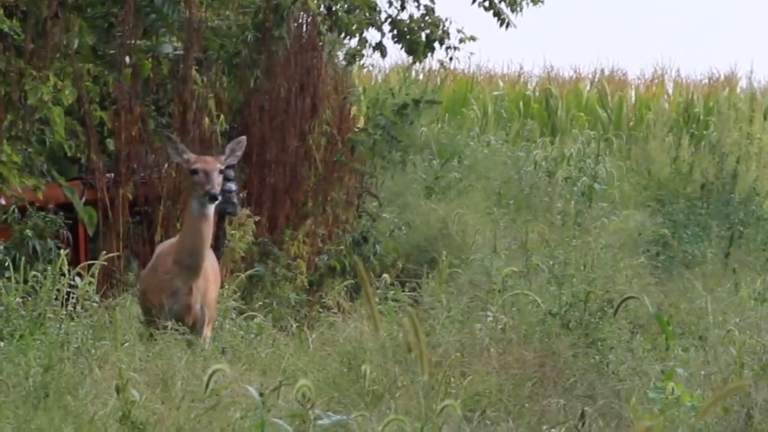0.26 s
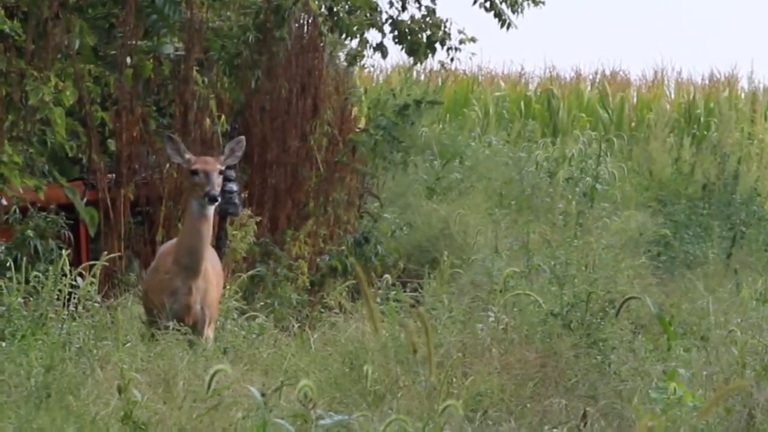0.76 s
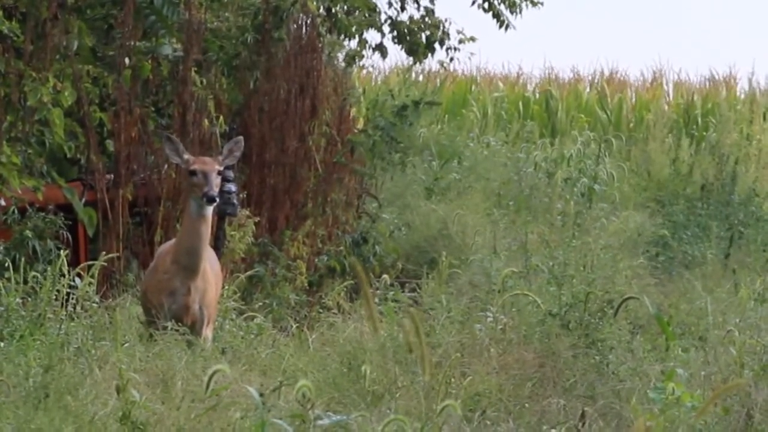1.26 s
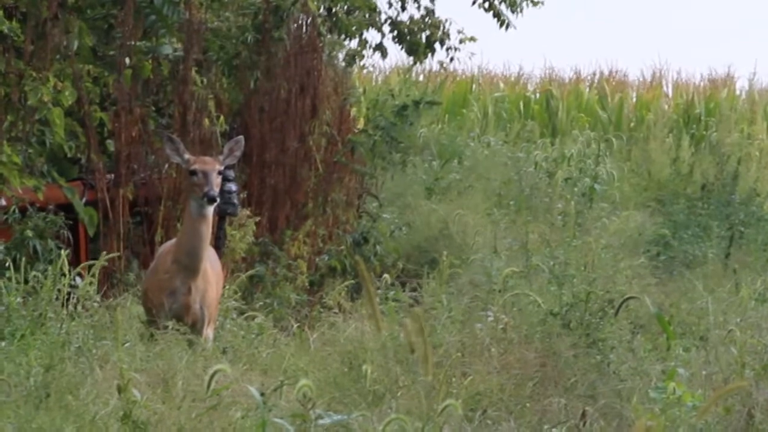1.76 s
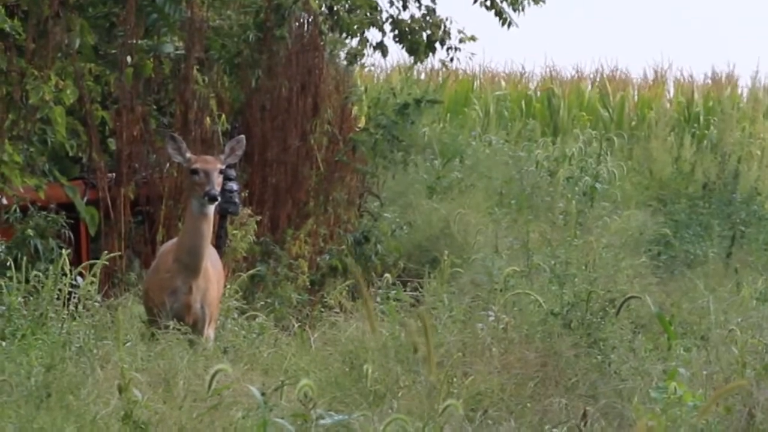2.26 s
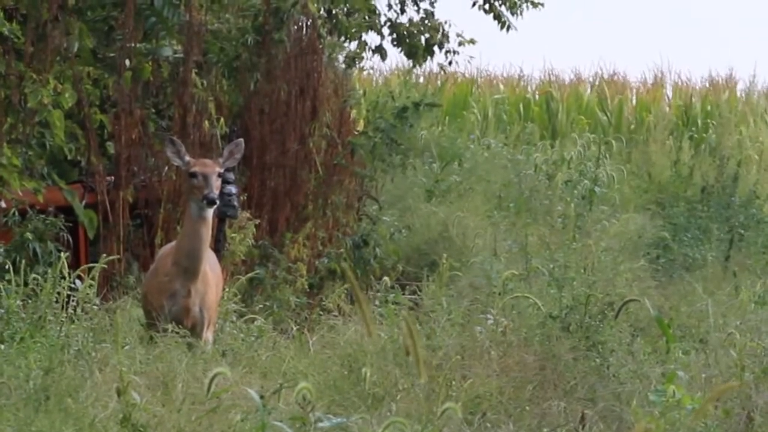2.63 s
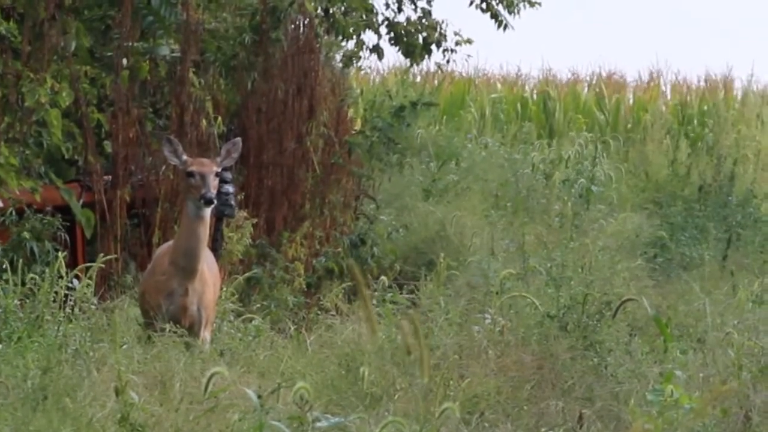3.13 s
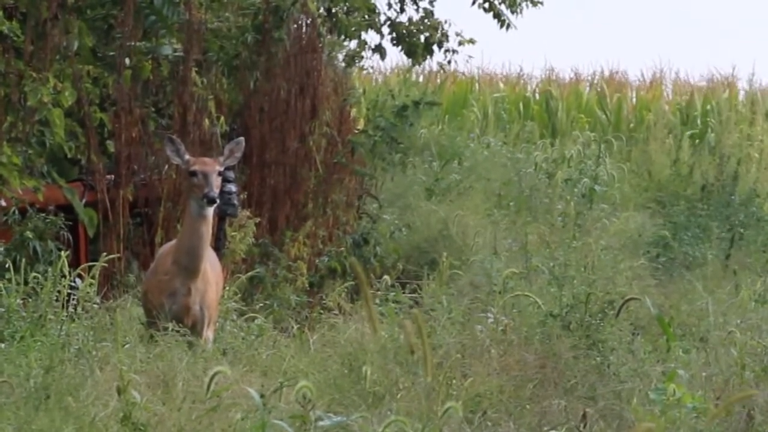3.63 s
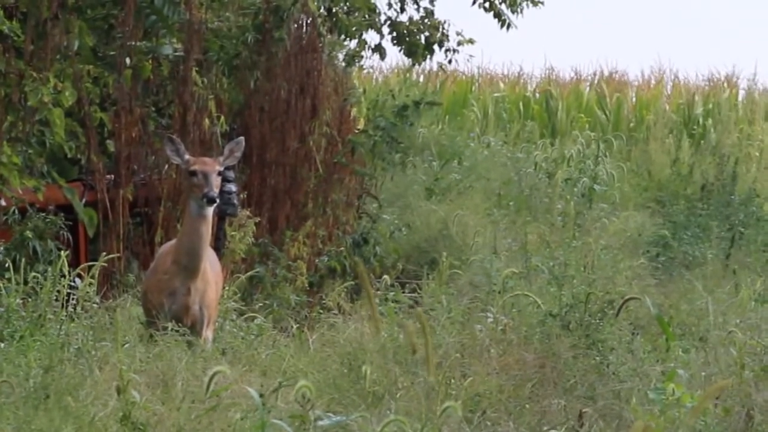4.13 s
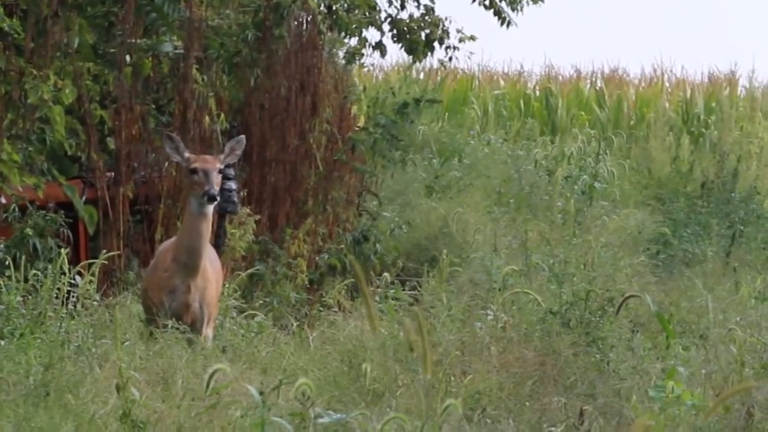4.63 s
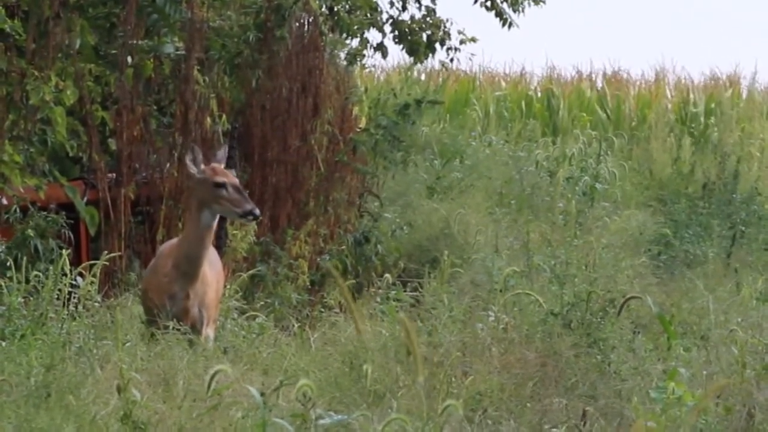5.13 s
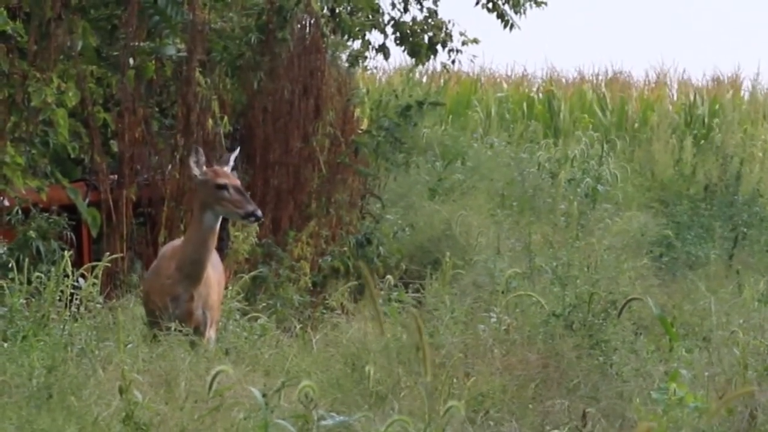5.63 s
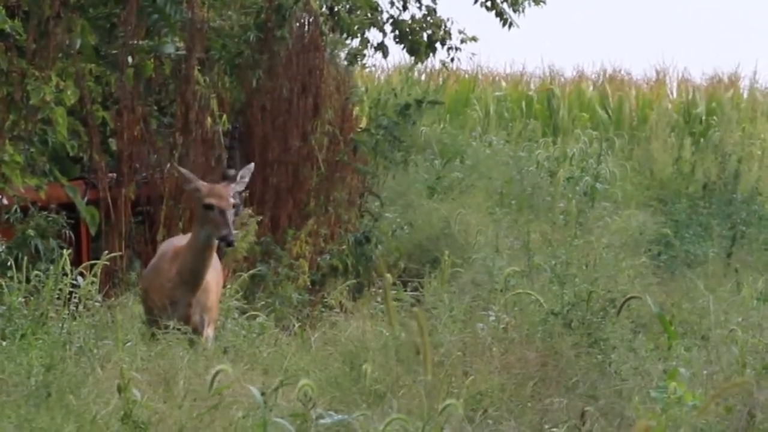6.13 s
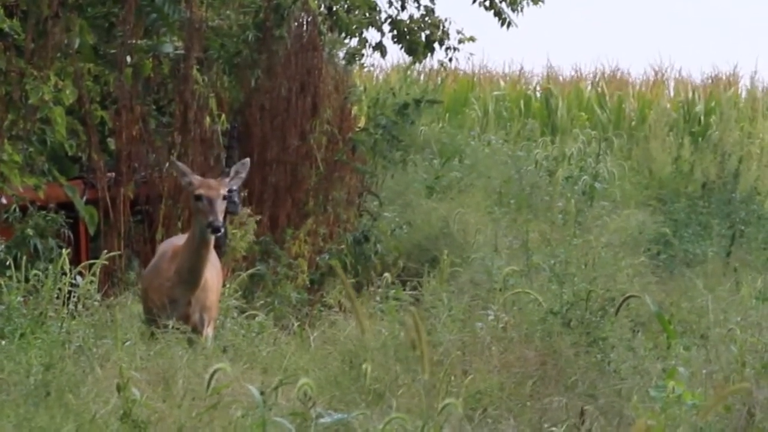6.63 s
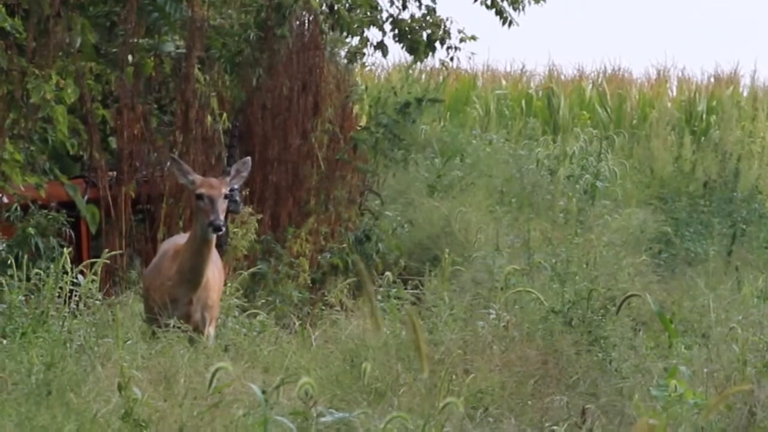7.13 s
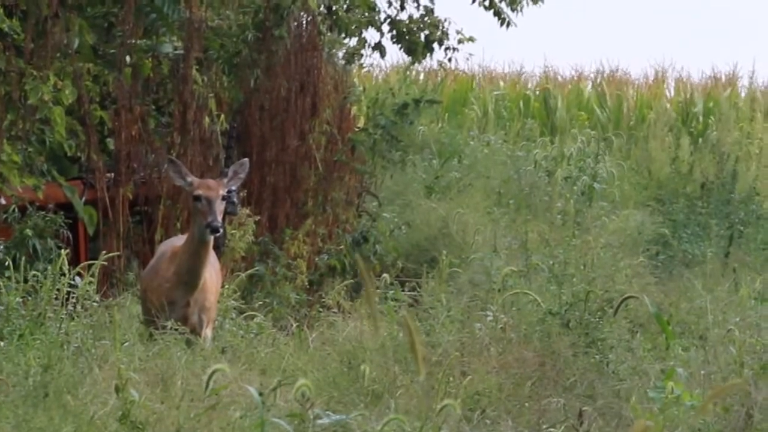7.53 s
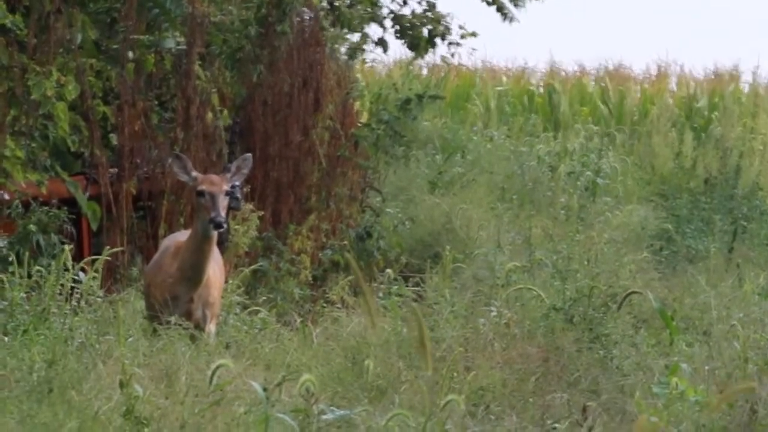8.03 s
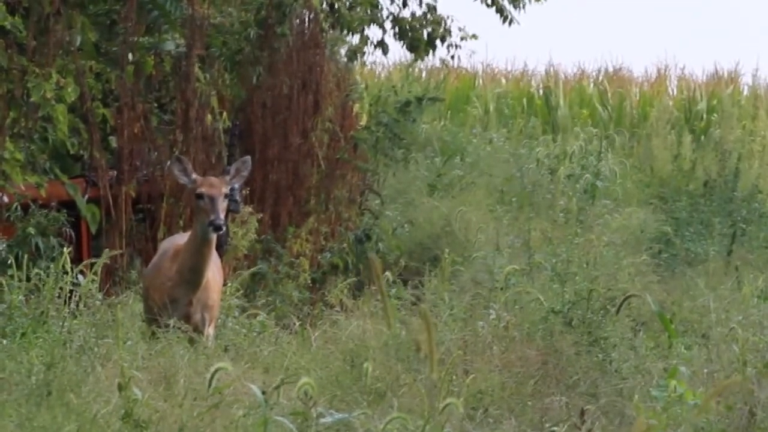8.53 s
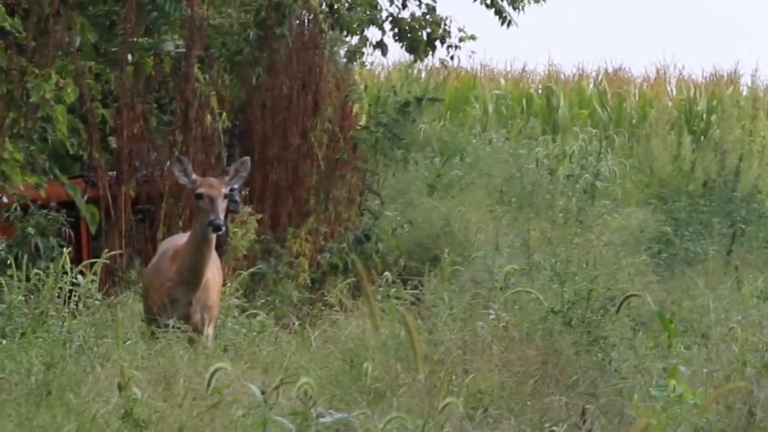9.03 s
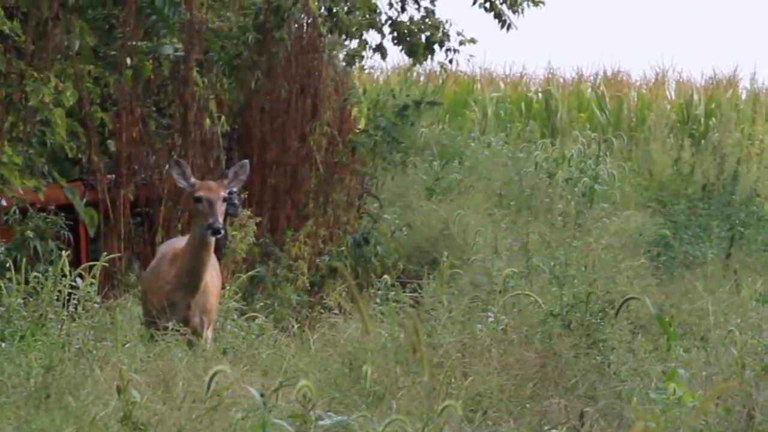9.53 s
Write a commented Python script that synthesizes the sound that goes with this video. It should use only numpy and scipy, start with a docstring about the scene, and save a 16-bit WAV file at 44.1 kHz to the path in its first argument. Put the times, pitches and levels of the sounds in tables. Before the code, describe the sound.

Outdoors beside tall grass and corn, insects sing without pause, slightly blurred by plants and trees. One rapid high triller stays steady, triple chirps grow stronger from midway, and a slower trill fades in for the last two seconds. Quiet airy hiss and distant road rumble sit below. Small dry ticks crackle close to the microphone early, a barely audible grass brush follows, and a single hard clack interrupts near the end. Same sound in both ears.

```python
"""Crickets sing in tall grass at the edge of a field: a fast and a slow triller, two that chirp in threes,
and a chorus of far ones, with more chirpers deep in the field. Each wing stroke is a short arched whistle,
scattered by plants and trees. Filtered noise makes the open air and the rumble of distant traffic; wavering
sines make two engine drones. Dry clicks and one clack, ringing small dead bodies, sound close by,
and one soft brush of noise passes in the grass."""
import sys
import numpy as np
from scipy import signal
from scipy.fft import rfft, irfft
from scipy.io import wavfile
from scipy.ndimage import uniform_filter1d

SR = 44100
rng = np.random.default_rng(int(sys.argv[2]) if len(sys.argv) > 2 else 0)


def wav_record(signal):
    """Record a signal, one row per channel, as 16-bit PCM in the file named by sys.argv[1]."""
    frames = np.transpose(np.atleast_2d(signal))
    bounded = np.clip(frames, -1, 1)
    # unit amplitude maps onto the largest positive 16-bit level
    quanta = np.round(bounded * 32767).astype(np.int16)
    wavfile.write(sys.argv[1], SR, quanta)


N = 431298  # length [samples]


def undb(db):
    """Decibels to amplitude gain."""
    return 10 ** (np.asarray(db) / 20)


def rms(x):
    """Root mean square."""
    return np.sqrt(np.mean(x ** 2))


def fade(t, t60):
    """Exponential decay that falls 60 dB in t60 seconds."""
    return np.exp(-np.log(1000) * t / t60)


def swell_of(rows):
    """A (time [s], level [dB]) table joined by straight lines, in dB about its own mean."""
    times, levels = np.transpose(rows)
    db = np.interp(np.arange(N) / SR, times, levels)
    return db - db.mean()


def add(out, s, sound):
    """Mix a sound in at time s, dropping whatever lies outside the scene."""
    i = int(s * SR)
    lo, hi = max(i, 0), min(i + len(sound), N)
    if hi > lo:
        out[lo:hi] += sound[lo - i:hi - i]


def walk(rate):
    """Smooth random wander with unit RMS; rate is in new random values a second."""
    k = int(SR / rate)
    held = np.repeat(rng.standard_normal(N // k + 1), k)
    smooth = uniform_filter1d(held, k)[:N]
    return smooth / rms(smooth)


def noise(points):
    """Unit-RMS noise whose spectrum joins (frequency [Hz], level [dB]) points on a log frequency axis."""
    hz, db = np.transpose(points)
    bins = np.maximum(np.arange(N // 2 + 1) * SR / N, 1)
    gain = undb(np.interp(np.log(bins), np.log(hz), db))
    x = irfft(rfft(rng.standard_normal(N)) * gain, N)
    return x / rms(x)


def bandpass(x, order, low_hz, high_hz):
    """Butterworth band-pass."""
    return signal.sosfilt(signal.butter(order, [low_hz, high_hz], "bandpass", fs=SR, output="sos"), x)


# Open air: (frequency [Hz], relative density [dB per Hz])
AIR_SPECTRUM = [(20, -7), (50, 2.5), (120, 0), (250, -4), (360, -4), (460, -6.5), (600, -8), (1100, -9),
                (1450, -13), (2300, -14.5), (3200, -15.5), (7500, -20.5), (10000, -31), (15000, -42.5)]
AIR_DB = -49.5  # RMS level
# Swell of far traffic, heard about its own mean: (time [s], level [dB])
TRAFFIC_SWELL = [(0.0, -55), (0.87, -54), (2.72, -53), (3.38, -55), (6.67, -54.5), (7.82, -52.5),
                 (9.78, -51.5)]
LOW_DRONE_DB = -61.5  # resting level, before swells and flutter
# The low engine drone swells under load: (time [s], half length to 1/e [s], rise [dB])
DRONE_SWELLS = [(4.5, 0.78, 7.6), (7.5, 0.54, 8.2)]
HIGH_DRONE_DB, HIGH_DRONE_FALL_DB_PER_S = -56.5, 1.5  # starting level of the receding drone, and its fall


def distance(waver_db=.5, traffic_low_hz=150, traffic_top_hz=2000):
    """Open-air hiss, its traffic band swelling as a rumble, and two engine drones wavering in pitch and level."""
    t = np.arange(N) / SR
    air = noise(AIR_SPECTRUM) * undb(AIR_DB)
    road = bandpass(air, 1, traffic_low_hz, traffic_top_hz)
    road_gain = undb(swell_of(TRAFFIC_SWELL) + waver_db * walk(9.6))
    out = air + road * (road_gain - 1)  # the air already holds the band once
    load_db = sum(rise_db * np.exp(-((t - s) / width) ** 2) for s, width, rise_db in DRONE_SWELLS)
    low_db = LOW_DRONE_DB + load_db
    high_db = HIGH_DRONE_DB - HIGH_DRONE_FALL_DB_PER_S * t
    for hz, wander_hz, flutter_db, db in [(88.0, 4.04, 0.91, low_db), (223.8, 1.52, 0.44, high_db)]:
        phase = 2 * np.pi * np.cumsum(hz + wander_hz * walk(14)) / SR
        out = out + undb(db + flutter_db * walk(8)) * np.sin(phase)
    return out


FIELD_T60_S = .22  # how long the field's reflections take to fall 60 dB


def scatter(x, echo_db, t60):
    """Countless weak reflections from stalks and trees follow the sound, shifting as the air moves."""
    t = np.arange(SR // 2) / SR
    tail = fade(t, t60) * np.minimum(t / 0.0032, 1)  # reflections build up over 3.2 ms
    drift = np.pi * walk(0.99)
    echo = np.zeros(N)
    # two random sets of reflections trade places
    for share in (np.cos(drift), np.sin(drift)):
        reflections = rng.standard_normal(len(t)) * tail
        echo += share * signal.fftconvolve(x, reflections)[:N]
    return x + echo * undb(echo_db) * rms(x) / rms(echo)


def wing(u, top_hz, crest, droop, slide, octave_db, start):
    """The scraper runs along the file (u 0-1): pitch arches with its speed and slides down as the wings stop."""
    hz = top_hz * (1 - droop * ((u - crest) / (1 - crest)) ** 2 - slide * u ** 10)
    phase = start + 2 * np.pi * np.cumsum(hz) / SR
    swell = np.abs(np.sin(np.pi * u)) ** .8
    return swell * (np.sin(phase) + undb(octave_db) * np.sin(2 * phase))


def cricket(strokes, shape, voice, pitch_scatter=0.0022, scatter_db=.5):
    """One insect plays strokes (centre time [s], level [dB]), no two quite alike; softer ones are flatter."""
    length, top_hz, crest, droop, slide = shape
    octave_db, echo_db = voice
    out, u = np.zeros(N), np.linspace(0, 1, int(length * SR))
    loudest = max(db for s, db in strokes)
    variations = rng.standard_normal((len(strokes), 3))
    for (s, db), (detune, force, start) in zip(strokes, variations):
        hz = top_hz * (1 + pitch_scatter * detune - .0025 * (loudest - db))
        stroke = wing(u, hz, crest, droop, slide, octave_db, 2 * np.pi * start)
        add(out, s - length / 2, undb(db + scatter_db * force) * stroke)
    return scatter(out, echo_db, FIELD_T60_S)


# Far trillers: (top pitch [Hz], pace [strokes/s], stroke length [s], pitch droop [0-1])
CHORUS = [(4710, 63.7, .011, .05), (4910, 63.2, .011, .05), (5250, 65.2, .009, .08), (5080, 72.3, .01, .08),
          (4690, 52, .014, .15), (4450, 29, .02, .13), (5860, 27, .02, .16), (6230, 25, .022, .15),
          (6430, 41, .018, .09), (7060, 31, .018, .05)]
# How each arrives: (mean level [dB RMS, before swells], octave [dB re fundamental], echo [dB re direct])
CHORUS_VOICES = [(-52, -26, -9), (-52.5, -26.5, -2), (-53, -36, -10), (-52.5, -38, -2), (-54, -38, 1),
                 (-55.5, -40, -1), (-56.5, -32, 2), (-51.5, -48, 0.5), (-59.5, -50, -1), (-68, -42, -19)]
# Shared swell of the lower voices, heard about its own mean and then scaled: (time [s], level [dB])
CHORUS_SWELL = [(0.0, -44), (2.01, -46), (2.72, -44.5), (4.76, -44), (5.34, -46), (6.54, -45), (6.7, -44.5),
                (8.58, -44), (8.74, -44.5), (9.78, -44.5)]
LOWER_VOICES_HZ = 5500  # voices below this swell together
HIGHEST_STOPS_S = 7.2  # the highest voice falls silent


def chorus(swell_db=0.6, pace_scatter=.008, lower_swell=1.04):
    """Far crickets trill on, their strokes blurred by the field; the lower ones swell together, the highest stops."""
    out, together = 0, lower_swell * swell_of(CHORUS_SWELL)
    highest_hz = max(CHORUS)[0]
    for (top_hz, rate, length, droop), (db, octave_db, echo_db) in zip(CHORUS, CHORUS_VOICES):
        gaps = (1 + pace_scatter * rng.standard_normal(int(rate * N / SR) + 2)) / rate
        times = np.cumsum(gaps) - (1 + rng.random()) / rate
        shape = (length, top_hz, .3, droop, 0)
        song = cricket([(s, 0) for s in times], shape, (octave_db, echo_db), pitch_scatter=0.0049)
        level_db = db + swell_db * walk(1.8) + together * (top_hz < LOWER_VOICES_HZ)
        song = song / rms(song) * undb(level_db)
        if top_hz == highest_hz:
            song = song * fade(np.maximum(np.arange(N) / SR - HIGHEST_STOPS_S, 0), FIELD_T60_S)
        out = out + song
    return out


def chirps(rows, pattern):
    """Lay a stroke pattern (delay [s], accent [dB]) on each chirp (time [s], level [dB])."""
    return [(s + delay, db + accent) for s, db in rows for delay, accent in pattern]


# Three strokes of a far chirp: (delay [s], accent [dB])
FAR_PATTERN = [(0, -2), (.06, 1.5), (0.124, 1.3)]
# Wing strokes: (length [s], top pitch [Hz], place of the top [0-1], pitch droop [0-1], closing slide [0-1])
REMOTE_STROKES = [(.024, 4130, .3, .1, .03), (.022, 4520, .3, .1, .03)]
# How the songs arrive: (octave [dB re fundamental], echo [dB re direct])
REMOTE_VOICE = (-30, 0)


def remote_chirpers(db=-52, pause=0.63, spread_db=2.5):
    """More of the chirping kind, deep in the field, each keeping its own loose time."""
    out = 0
    for shape in REMOTE_STROKES:
        timing, force = rng.standard_normal((int(N / SR / pause) + 2, 2)).T
        times = pause * (np.cumsum(1 + .12 * timing) - 1 - rng.random())
        strokes = chirps(zip(times, db + spread_db * force), FAR_PATTERN)
        out = out + cricket(strokes, shape, REMOTE_VOICE)
    return out


# A softly started trill is up to this much weaker at first, and takes this long to reach full voice
WARM_UP_DB, WARM_UP_S = 9, 2


def trill(rows, full_db, slips=()):
    """Strokes (time [s], level [dB]) at an easing pace; soft starts warm up and the strokes nearest slips weaken."""
    strokes = []
    for start, count, first_rate, last_rate, softness in rows:
        elapsed = np.append(0, np.cumsum(1 / np.linspace(first_rate, last_rate, count - 1)))
        levels = full_db - softness * WARM_UP_DB * np.maximum(1 - elapsed / WARM_UP_S, 0)
        for when, loss_db in slips:
            levels[np.argmin(abs(start + elapsed - when))] += loss_db
        strokes += zip(start + elapsed, levels)
    return strokes


# Trill: (start [s], strokes, first pace [strokes/s], last pace [strokes/s], softness of the start [0-1])
FAST_TRILLS = [(.008, 192, 19.62, 19.53, 0)]
# Strokes that barely catch: (time [s], level change [dB])
FAST_SLIPS = [(4.039, -3.5), (4.14, -9), (7.615, -4.5)]
# Wing stroke: (length [s], top pitch [Hz], place of the top [0-1], pitch droop [0-1], closing slide [0-1])
FAST_STROKE = (.023, 6605, .43, .115, .01)
# How the song arrives: (octave [dB re fundamental], echo [dB re direct])
FAST_VOICE = (-52, -7)


def fast_triller():
    """High wing strokes in one long quick trill, a few of them slipping."""
    return cricket(trill(FAST_TRILLS, -39.5, FAST_SLIPS), FAST_STROKE, FAST_VOICE)


# Chirps of varying force: (time [s], level [dB])
NEAR_CHIRPS = [(.018, -41.5), (.749, -43), (1.935, -41), (2.708, -38), (3.628, -38.5), (4.204, -31),
               (4.946, -41), (5.548, -38.5), (6.111, -34.5), (6.723, -33), (7.36, -33), (8.022, -33),
               (8.716, -34), (9.333, -32.5)]
# Three strokes of a chirp: (delay [s], accent [dB])
NEAR_PATTERN = [(0, -5.5), (.059, -1.5), (.13, -1.5)]
# Wing stroke and arrival: columns as for the fast triller
NEAR_STROKE = (.021, 4305, .15, .03, .14)
NEAR_VOICE = (-25.5, -10)


def near_chirper():
    """Three wing strokes a chirp; pitch follows the varying force."""
    return cricket(chirps(NEAR_CHIRPS, NEAR_PATTERN), NEAR_STROKE, NEAR_VOICE, pitch_scatter=.005)


# Trills: (start [s], strokes, first pace [strokes/s], last pace [strokes/s], softness of the start [0-1])
SLOW_TRILLS = [(.079, 13, 11.24, 11.18, 0), (7.633, 26, 12.12, 11.52, 1)]
# Wing stroke and arrival: columns as for the fast triller
SLOW_STROKE = (.024, 5795, .35, .06, .03)
SLOW_VOICE = (-41, -11.5)


def slow_triller():
    """Slower wing strokes in two trills, the second warming up from a soft start."""
    return cricket(trill(SLOW_TRILLS, -35.5), SLOW_STROKE, SLOW_VOICE)


# Chirps in a loose beat: (time [s])
FAR_CHIRPS = [.2, .86, 1.48, 2.087, 2.712, 3.397, 4.004, 4.591, 5.236, 5.852, 6.472, 7.076, 7.768, 8.411,
              9.063, 9.722]
# Wing stroke and arrival: columns as for the fast triller
FAR_STROKE = (.025, 4215, .3, .05, .03)
FAR_VOICE = (-17, -0.34)


def far_chirper(db=-45):
    """Three wing strokes a chirp, at one strength, with an echo nearly as strong as the song."""
    strokes = chirps([(s, db) for s in FAR_CHIRPS], FAR_PATTERN)
    return cricket(strokes, FAR_STROKE, FAR_VOICE, pitch_scatter=.005)


# Crackle around the first clicks: start, span, level at the start, fall
CRACKLE_S, CRACKLE_LENGTH_S, CRACKLE_DB, CRACKLE_FALL_DB_PER_S = .516, .08, -31, 118


def crackle(count=12, spread_db=3, sharp_db=4):
    """Faint clicks (time [s], level [dB], sharp edge [dB]) at random, thinning out and dying away."""
    delays = CRACKLE_LENGTH_S * rng.random(count) ** 2
    levels = CRACKLE_DB - CRACKLE_FALL_DB_PER_S * delays + spread_db * rng.standard_normal(count)
    return [(CRACKLE_S + delay, db, sharp_db) for delay, db in zip(delays, levels)]


# Dry clicks and the late clack: (time [s], level [dB], extra level of the sharp edge [dB])
CLICKS = [(.4875, -33, 7), (.5123, -24.5, -1), (.515, -24.5, 0), (.5272, -19.5, -11), (.5313, -22, 1),
          (.5445, -25.5, 1.5), (.578, -31, 0), (.624, -29, 1), (.666, -32.5, 8), (.672, -25, -3),
          (9.6351, -8.5, -8), (9.637, -19, -3)]
# Modes they ring with, detuned at random: (frequency [Hz], relative level [dB], t60 [s])
CLICK_BODY = [(202, -23, .1), (480, -16, 0.021), (734, -14, 0.054), (1140, -2.5, 0.013),
              (1360, -11.5, 0.013), (1810, -6.5, 0.0076), (2640, -20, 0.0058), (5740, -6.5, 0.011)]
# Spectrum of the diffuse tail: (frequency [Hz], relative level [dB])
CLICK_TAIL = [(150, 8), (600, -2), (1200, -3.5), (2500, -4), (4000, -16), (7000, -10), (11000, -22),
              (16000, -47)]


def clicks(tail_db=-17, tail_t60=0.095, edge_db=-8, edge_t60=0.01, low_hz=240, top_hz=7500):
    """Each click rings a small dead body, with a sharp noise edge and a short diffuse tail."""
    out, t = np.zeros(N), np.arange(SR // 5) / SR
    tail = noise(CLICK_TAIL)
    edge = noise([(500, -8.5), (2500, 1.5), (6500, -1.5), (10000, -11), (15000, -41)])
    for k, (s, db, sharp_db) in enumerate(CLICKS + crackle()):
        ring = np.zeros(len(t))
        for hz, mode_db, t60 in CLICK_BODY:
            mode_hz = hz * (1 + 0.054 * rng.standard_normal())
            ring += undb(mode_db) * np.sin(2 * np.pi * mode_hz * t) * fade(t, t60)
        part = slice(k * len(t), (k + 1) * len(t))  # fresh noise for every click
        spray = undb(tail_db) * tail[part] * fade(t, tail_t60)
        spray += undb(edge_db + sharp_db) * edge[part] * fade(t, edge_t60)
        add(out, s, undb(db) * (ring / 2 + spray))
    # a small body radiates little bass, and the clicks carry little above 7.5 kHz
    return bandpass(out, 2, low_hz, top_hz)


def rustle(s=2.5, width=0.041, db=-49):
    """One soft brush in the grass: noise under a bell-shaped swell."""
    swell = np.exp(-((np.arange(N) / SR - s) / width) ** 2)
    brush = noise([(100, -9), (400, 0), (1000, -1), (2500, -10), (5000, -29), (12000, -45)])
    return undb(db) * swell * brush


def scene():
    """All sources, the same in both ears."""
    background = distance() + chorus() + remote_chirpers()
    singers = fast_triller() + near_chirper() + slow_triller() + far_chirper()
    return np.tile(background + singers + clicks() + rustle(), (2, 1))


def record(dry, top_hz=15500):
    """A steep elliptic low-pass cuts the top."""
    return signal.sosfilt(signal.ellip(10, .1, 70, top_hz, fs=SR, output="sos"), dry)


dry = scene()
out = record(dry)
wav_record(out)
```